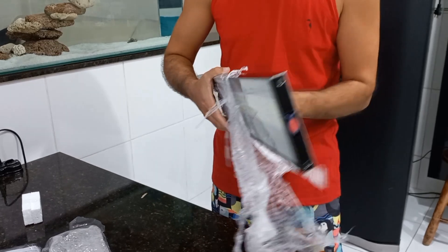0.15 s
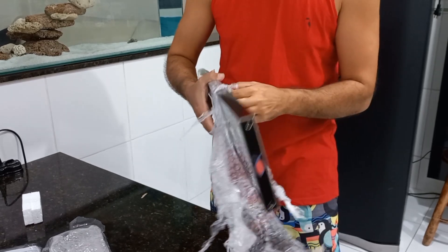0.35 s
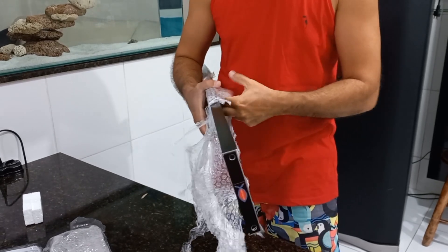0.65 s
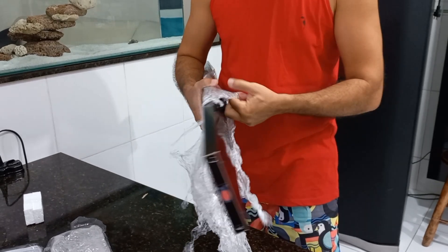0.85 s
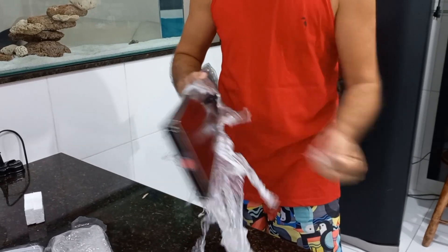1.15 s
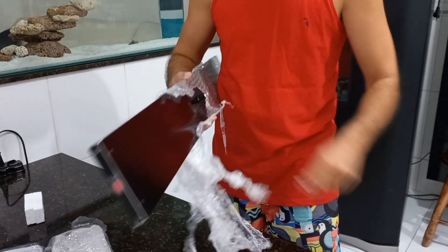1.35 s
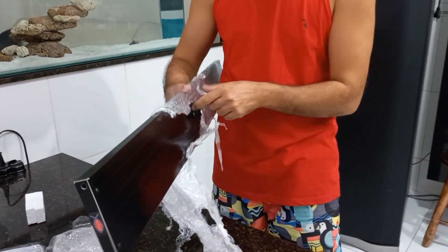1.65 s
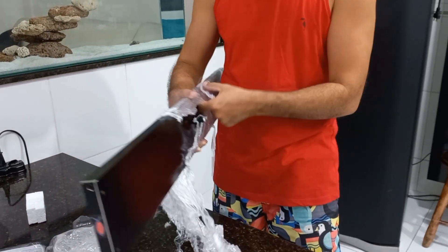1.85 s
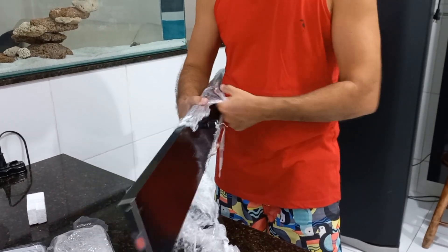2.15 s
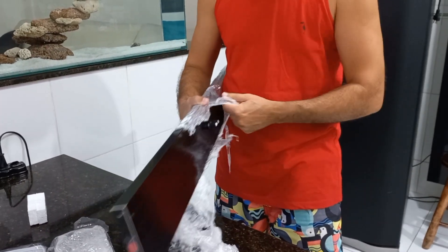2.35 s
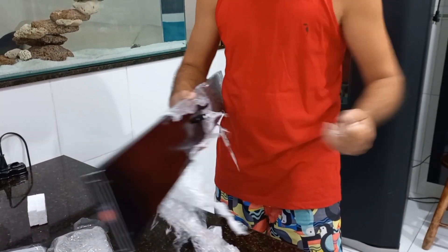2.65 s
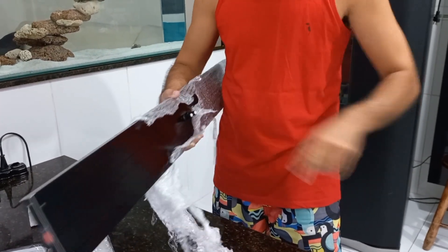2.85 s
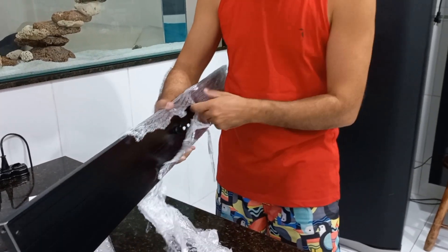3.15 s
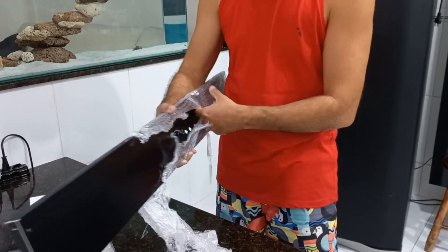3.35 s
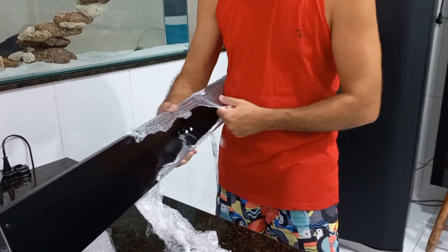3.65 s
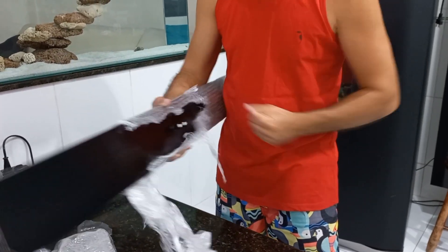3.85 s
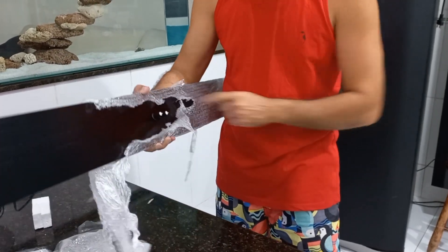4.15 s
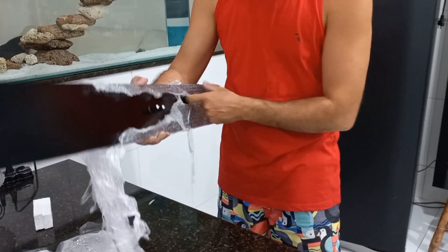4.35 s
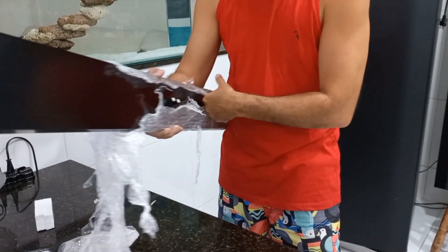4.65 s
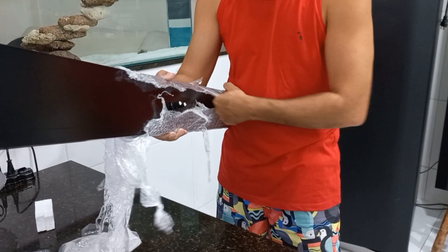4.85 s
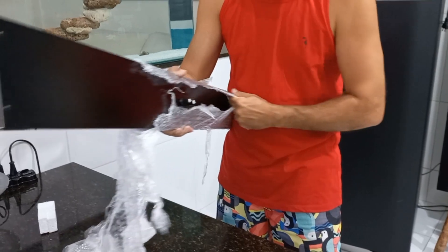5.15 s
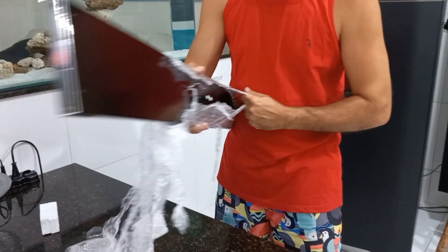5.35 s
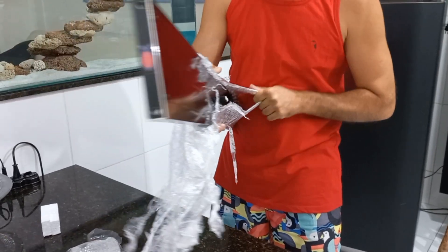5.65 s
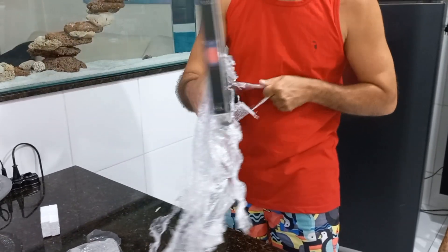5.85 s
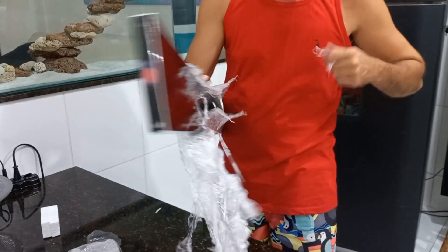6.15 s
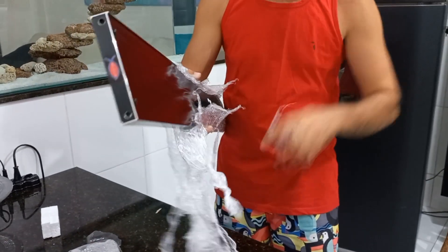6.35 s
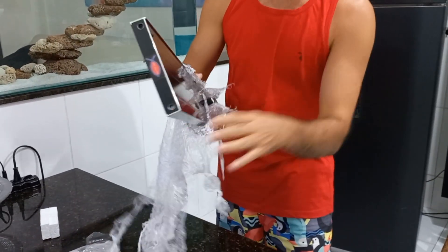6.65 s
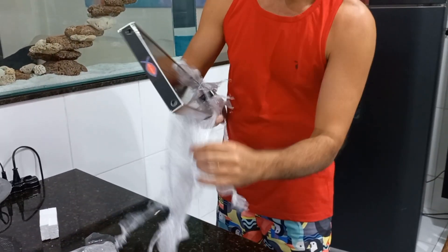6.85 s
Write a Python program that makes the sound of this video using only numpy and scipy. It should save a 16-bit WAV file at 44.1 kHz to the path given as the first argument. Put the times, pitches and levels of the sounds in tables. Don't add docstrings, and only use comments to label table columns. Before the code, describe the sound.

A steady, slightly throbbing low pump hum with buzzing harmonics and soft room murmur runs throughout, a little to the left. Film starts with faint rustles and small bumps; from 0.4 s it crinkles harder, and between 0.75 and 1.2 s comes the densest, loudest burst, with sharp cracks and a strip squeaking upward as it peels. It subsides by 1.4 s, nearly still until 1.7. Crisp snaps and dull panel thumps hit at 2.2 and 2.5-2.6 s, then lighter ticks and rubbing, with bumps at 3.1 and 3.8. A lull around 4-4.4 s leads to tugs at 4.8-4.95, a hard snap and short metallic rattle at 5.2, a bright rip near 5.7 and sharp cracks at 5.8. Smaller rustles at 6.05-6.3 fade to quiet, with a brief last crinkle near 6.9. Close microphone, hard tiled room, short bright reflections.

```python
import sys
import numpy as np
from scipy import signal
from scipy.io import wavfile
from scipy.ndimage import uniform_filter1d

SR = 44100
rng = np.random.default_rng(int(sys.argv[2]) if len(sys.argv) > 2 else 0)


def boost_factor(decibels):
    exponent = np.asarray(decibels, float) / 20
    return 10 ** exponent


def bounce(signal):
    frames = np.transpose(np.atleast_2d(signal))
    limited = np.clip(frames, -1, 1)
    pcm = np.round(limited * 32767).astype(np.int16)
    wavfile.write(sys.argv[1], SR, pcm)


N = 309042


def evened(x):
    return x / np.sqrt(np.mean(x ** 2) + 1e-20)


def unit(x):
    return x / np.linalg.norm(x, axis=-1, keepdims=True)


def peaked(x):
    return x / np.sqrt(uniform_filter1d(x ** 2, size=176).max() + 1e-20)


def read(points, hz):
    f, value = np.transpose(points)
    return np.interp(np.log(hz + 1), np.log(f + 1), value)


def curve(table):
    s, *columns = np.transpose(table)
    return [np.interp(np.arange(N) / SR, s, c) for c in columns]


def add(mix, s, sound):
    part = mix[round(s * SR):][:len(sound)]
    part += sound[:len(part)]


def band(x, lo_hz, hi_hz):
    return signal.sosfilt(signal.butter(3, [lo_hz, hi_hz], "bandpass", fs=SR, output="sos"), x)


def ring(x, hz, width):
    return signal.lfilter(*signal.iirpeak(hz, hz / width, SR), x)


# t/s, level/dB
PUMP_LOAD = [(0.0, -49), (0.97, -45), (1.65, -48), (2.2, -46), (3.14, -48.5), (3.55, -45.5), (4.17, -48.5),
             (4.56, -46), (5.98, -46), (6.28, -49), (7.0, -45.5)]
# multiple of the hum pitch, level/dB
HARMONICS = [(1.5, -13.5), (2, -14.5), (2.92, -18), (4, -14), (5, -26.5), (5.6, -18)]
# f/Hz, modulation depth
THROB = [(7, 0.11), (13.4, 0.11)]


def pump():
    t, hum_hz = np.arange(N) / SR, 120
    turns = 2 * np.pi * hum_hz * t
    throb = 1 + sum(depth * np.sin(2 * np.pi * hz * t + rng.uniform(0, 4.5)) for hz, depth in THROB)
    tone = throb * np.sin(turns)
    tone = tone + sum(boost_factor(db) * np.sin(k * turns + rng.uniform(0, 6.02)) for k, db in HARMONICS)
    return np.sqrt(2) * boost_factor(curve(PUMP_LOAD)[0]) * tone


# f/Hz, level per Hz/dB
AIR_SPECTRUM = [(15, -76), (25, -43.5), (124, -5), (214, -16.5), (330, -6.5), (399, -26.5), (483, -10.5),
                (1150, -34), (1880, -34), (2820, -48), (12600, -45.5), (15200, -51), (16500, -55)]
# f/Hz, coherence (0 to 1)
COHERENCE = [(60, .95), (250, .9), (700, .5), (1500, .1), (15000, .0)]


def air():
    frames, hz, level_db = N // 512 + 5, np.fft.rfftfreq(2048, 1 / SR), -53.5
    a, b, c, d = rng.standard_normal((frames, 1025, 4)).T
    same = np.clip(read(COHERENCE, hz), -1, 1)[:, None]
    left = a + 1j * b
    right = same * left + np.sqrt(1 - same ** 2) * (c + 1j * d)
    z = np.array([left, right]) * boost_factor(read(AIR_SPECTRUM, hz))[:, None]
    return boost_factor(level_db) * evened(signal.istft(z, nperseg=2048, noverlap=1536)[1][:, :N])


def strokes(s, db, fade_s, rise_share):
    t = np.arange(0, N + 64, 64) / SR
    late = (t - s[:, None]) / np.maximum(fade_s, 1 / 50)[:, None]
    fall = np.where(late > 0, late, -late / rise_share[:, None])
    power = boost_factor(2 * db[:, None] - 40 * fall).sum(axis=0)
    return np.interp(np.arange(N) / SR, t, power)


def tinted(x, points, unit_hz):
    hz, t, z = signal.stft(x, SR, nperseg=256)
    axis, db = np.transpose(points)
    place = (hz[:, None] + 1) / np.interp(t * SR, np.arange(N), unit_hz * np.ones(N))
    chance = rng.standard_normal((len(t), len(hz))).T
    patches = evened(uniform_filter1d(uniform_filter1d(chance, size=5, axis=0), size=8, axis=1))
    shape = boost_factor(np.interp(np.log(place), np.log(axis), db) + 1.5 * patches)
    return evened(signal.istft(z * shape, SR, nperseg=256)[1][:, :N])


# t/s, level/dB
HANDLING = [(0, -49.5), (.17, -71), (.42, -46), (.7, -43.5), (1.15, -36), (1.35, -49), (1.65, -75),
            (1.9, -46.5), (2.6, -42.5), (3.08, -65), (3.45, -41), (4.05, -56), (4.3, -54.5), (4.7, -43),
            (5.4, -44), (6.1, -52), (6.5, -90), (7.0, -48)]
# peak t/s, level/dB, 20 dB fading time/s, coarseness/dB
TUGS = [(0.03, -61, -1, -3), (.33, -47, .08, -3.5), (.4, -50, -0.1, -9.5), (.51, -34.5, -0.0748, 4),
        (.75, -31, -0.05, -1), (.81, -33, 0.0758, 9), (.93, -26, 0.09, 0.5), (1.055, -18, 0.08, -10.5),
        (1.2, -29.5, 0.13, -3), (1.76, -49, 0.07, -7), (1.86, -35.5, -0.04, 3), (1.97, -49, -0.25, -18),
        (2.08, -44, -0.04, -3), (2.22, -29, 0.0458, 5), (2.489, -34, -0.01, 8), (2.536, -21, 0.02, -22),
        (2.555, -26, 0.02, 6), (2.46, -39, -0.27, -12), (2.8, -46.5, 0.16, 6), (3.2, -52, 0.5, 0),
        (3.35, -36.5, 0.09, -6), (3.62, -39, 0.17, 3), (3.83, -33, 0.02, -3), (4.45, -41.5, 0.16, -6),
        (4.6, -50, -1.9, -10), (4.81, -46.5, -0.8, -8), (4.9, -36.5, 0.23, -3), (5.15, -35.5, 0.02, -9),
        (5.25, -28.5, 0.09, -15), (5.73, -53, 0.3, -6.5), (5.86, -31.5, 0.28, -11),
        (6.05, -50.5, 0.28, 9.5), (6.264, -30, 0.08, -24), (6.93, -35.5, 0.16, -2)]
# peak t/s, level/dB, 20 dB fading time/s, coarseness/dB
JERKS = [(0.465, -30.5, 0.18, -7), (1.15, -27, -0.02, -20), (1.779, -39, 0.18, -7), (3.176, -46, -0.1, -8),
         (6.222, -34.5, 0.1, -20), (3.796, -31, 0.04, -4.5), (5.667, -24.5, 0.03, -7.5),
         (5.682, -20.5, 0.0576, -6.5), (5.69, -22.5, 0.08, -7), (6.59, -56.5, 0.3, -7),
         (6.755, -54, 0.2, -13)]
# peak t/s, level/dB, 20 dB fading time/s
SLIDES = [(.2, -41.5, 0.3), (.47, -45, 0.1), (.75, -37.5, 0.3), (1.01, -31.5, -0.06), (1.14, -49.5, 1),
          (1.7, -43, 0.16), (2.21, -38, -0.13), (2.6, -32.5, 0.26), (2.52, -36.5, 0.13), (2.8, -46, -0.2),
          (3.2, -44, 0.3), (3.6, -44.5, 0.3), (3.868, -30.5, 0.16), (4.35, -42, 0.6), (4.9, -44, -0.5),
          (5.23, -34.5, 0.04), (5.685, -46, 1.1), (5.86, -37.5, 0.16), (6.05, -32, 0.22), (6.95, -44, 0.7)]
# f/Hz, level per Hz/dB
FINE_CREASES = [(1470, -15), (2500, -3.5), (3460, 6), (8910, 13.5), (13100, 16.5), (16000, 12),
                (16500, 3.5)]
# f/Hz, level per Hz/dB
SCRAPE = [(600, -15), (1100, -4), (1800, 0), (2600, -1), (4000, -3.5), (6000, -13.5), (9000, -40)]
# t/s, level/dB, f/Hz
STRIP = [
    (.89, -86.5, 1900),
    (.903, -37, 2040),
    (.95, -39.5, 2170),
    (.995, -65, 2300),
    (1.035, -29, 2660),
    (1.14, -57, 2560),
    (1.21, -35, 2550),
    (1.3, -60, 2600),
    (1.45, -99.5, 2700),
]
# multiple of its pitch, level/dB
STRIP_BAND = [(.5, -40), (.75, -14), (.9, -3), (1, 0), (1.15, -4), (1.4, -12), (2, -40)]


def rustle():
    (busy_db,), (s, db, fade_s, coarse_db) = curve(HANDLING), np.transpose(TUGS + JERKS)
    busy = boost_factor(busy_db) ** 2
    rise = np.repeat([0.63, 0.056], [len(TUGS), len(JERKS)])
    hiss = np.sqrt(strokes(s, db, fade_s, rise) + busy)
    scrape = np.sqrt(strokes(s, db + coarse_db, 1.09 * fade_s, rise) + busy * boost_factor(-3) ** 2)
    slide = np.sqrt(strokes(*np.transpose(SLIDES), np.full(len(SLIDES), .5)) + busy * boost_factor(-6) ** 2)
    strip_db, strip_hz = curve(STRIP)
    clumps = np.clip(evened(uniform_filter1d(rng.standard_normal(N), size=250)), -2, 2)
    size = boost_factor(1.7 * np.minimum(rng.exponential(1, (3, N)), 3) + 2.0 * clumps)
    struck = rng.random((3, N)) < 2000 / SR
    creases = evened(size * struck * rng.choice([-1., 1.], (3, N)))
    creases = creases + 0.38 * rng.standard_normal((3, N))
    ports = creases[0] + 2.0 * creases[1:]
    rub = evened(band(ring(rng.standard_normal(N), 390, 355), 200, 1220))
    film = boost_factor(-5) * hiss * tinted(ports, FINE_CREASES, 0.96)
    film = film + boost_factor(-8.5) * scrape * tinted(ports, SCRAPE, 1.0)
    return film + boost_factor(strip_db) * tinted(ports, STRIP_BAND, strip_hz) + boost_factor(-9.5) * slide * rub


# f/Hz, 60 dB decay time/s
DECAY_TIMES = [(150, 0.37), (500, 0.76), (1700, 0.65), (4600, 0.63), (12000, 0.43)]


def walls(x):
    out, phase = np.zeros((2, N)), np.arange(N) / SR * 7.3
    slots = np.arange(120, SR - 12, 12)
    for k in range(3):
        taps = np.zeros((2, SR))
        at = slots + rng.integers(0, 12, (2, len(slots)))
        np.put_along_axis(taps, at, rng.choice([-1., 1.], at.shape), 1)
        hz, t, z = signal.stft(taps, SR, nperseg=256)
        low = np.exp(-(hz[:, None] / 450) ** 2)
        z[1] = low * z[0] + np.sqrt(1 - low ** 2) * z[1]
        tail = signal.istft(z * boost_factor(-60 * t / read(DECAY_TIMES, hz)[:, None]), SR, nperseg=256)[1]
        share = np.sqrt(2 / 3) * np.cos(phase + k * np.pi / 3)
        out += signal.fftconvolve((share * x)[None], tail / np.linalg.norm(tail[0]), axes=1)[:, :N]
    return out


# t/s, level/dB, fold f/Hz, dull part level/dB, bright part level/dB
CRACKS = [(0.476, -38, 7500, -22.5, -2), (0.7689, -20, 4560, -12, -1), (0.7802, -21.5, 4430, -4, 2),
          (0.7958, -20.5, 2290, -26, -3), (0.8963, -15.5, 2000, -7.5, -5), (1.0034, -19, 2400, -4, 3.5),
          (1.029, -15, 2780, -11, -7), (1.8214, -32, 2450, -22, -11), (1.8418, -38, 2610, -8, 11),
          (2.168, -13, 6600, -7.5, -13), (2.1912, -29, 2580, 0, 8), (2.195, -23.5, 7540, -1, 0),
          (2.4761, -18, 3500, -3, -3.5), (2.4795, -30, 2950, -5, -20), (2.56, -28, 2320, -16, -16),
          (3.1158, -48.5, 1300, 11.5, 11), (3.5637, -31.5, 2120, 6.5, -7.5), (4.825, -27, 2760, -1.5, -5),
          (4.8581, -30, 2470, 1.5, -19), (4.952, -23, 1900, 3, 1.5), (5.1708, -23.5, 2430, 3.5, 6),
          (5.2174, -17, 2740, -3, 0.5), (5.8205, -19, 4400, -0.5, -8), (5.83, -15.5, 7650, -10.5, 1.5),
          (5.93, -30.5, 2700, 0.5, -6)]
# t/s, level/dB, fold f/Hz, thinness/dB (treble up,
# body down)
TICKS = [(0.508, -32.5, 6500, 1), (0.7173, -45, 3200, 6), (0.7274, -37, 3220, 1), (1.6656, -57, 5960, 10.5),
         (1.7792, -61, 5400, 6), (1.853, -34.5, 7500, 6.5), (2.0014, -48, 3250, 4), (2.067, -42, 3100, -1),
         (2.105, -40, 2750, -12), (2.533, -46, 10400, 25), (2.7264, -43, 4770, -8), (3.1774, -40, 2850, -2),
         (3.248, -46.5, 7800, 14.5), (3.3435, -37, 4900, -4.5), (3.3621, -39, 3000, 7),
         (3.3903, -43, 3220, 7.5), (3.6423, -37.5, 6040, 10), (3.792, -37, 1830, -8.5),
         (3.8214, -39, 2400, 8), (3.8423, -38.5, 2100, -17), (4.211, -48, 1950, -10.5),
         (4.541, -42.5, 4200, 2.5), (4.5703, -34.5, 7600, 2.5), (4.6032, -37, 2800, -1),
         (4.9356, -42, 7500, 10), (5.163, -46, 7000, 10), (5.452, -39, 2800, 0.5),
         (5.5954, -41, 4940, 11.5), (5.6282, -42.5, 4570, 10), (6.1687, -52.5, 7200, 15.5),
         (0.231, -53, 1800, -0.5), (4.843, -40, 2680, -2), (2.429, -47, 3100, 7),
               (3.1896, -41.5, 3960, 4), (4.292, -62.5, 1800, -8), (4.359, -49.5, 2200, -5),
               (4.409, -52.5, 4100, 12), (5.0627, -43, 1800, 6), (5.414, -53, 7500, 4),
               (5.577, -44.5, 7600, 7.5), (6.614, -61.5, 3650, 1), (6.665, -66.5, 5700, 3),
               (0.033, -51, 2500, -5), (0.156, -60, 5000, 3.5), (1.9671, -56, 11400, 8),
               (2.543, -37, 4000, 7), (2.577, -40, 3000, 0), (3.204, -46, 3300, 2), (5.61, -45.5, 8000, 7),
               (6.033, -36, 2500, -2), (6.1, -52, 3000, -10), (6.2036, -53, 4100, 5)]


def snaps():
    direct, feed, t = np.zeros((2, N)), np.zeros(N), np.arange(300) / SR
    click = np.eye(1, 400)[0]
    wide, dull, bright = [unit(band(click, *edges)) for edges in ((2540, 6600), (678, 2630), (6880, 15800))]
    spans = np.array([.0017, .00005, .0020, .0011])
    # share thrown to the walls, dB
    rows = [row + (-4,) for row in CRACKS]
    rows += [(s, db, hz, -7.5 - thin, -1 + thin, -3) for s, db, hz, thin in TICKS]
    chance = rng.standard_normal((len(rows), 3, 300))
    for (s, db, hz, dull_db, bright_db, wall_db), z in zip(rows, chance):
        fold = unit(ring(click, hz, 0.2 * hz))
        colours = np.array([wide, fold, -dull, -bright])
        sizes = boost_factor(db + 20 + np.array([-5, -2, dull_db, bright_db]))
        for port in range(2):
            smears = (z[0] + 1.59 * z[1 + port]) * np.exp(-(t / spans[:, None]) ** 2)
            add(direct[port], s, sizes @ unit(signal.fftconvolve(colours, smears, axes=1)))
        add(feed, s, boost_factor(wall_db) * sizes @ colours)
    worktop_s, worktop_db = 0.0033, -13.5
    echo = np.roll(direct[::-1], round(worktop_s * SR), axis=1)
    return direct + boost_factor(worktop_db) * echo, feed


# t/s, peak level/dB, f/Hz, scrabble length/s
BUMPS = [(0.158, -38.5, 606, 0.085), (0.391, -35.5, 336, 0.036), (0.531, -32.5, 347, 0.051),
         (0.735, -35, 660, 0.036), (0.797, -23.5, 656, 0.0069), (0.897, -26.5, 620, 0.02),
         (0.998, -37, 633, 0.04), (1.325, -35, 647, 0.047), (1.672, -30, 345, 0.028),
         (2.108, -34, 394, 0.094), (2.193, -23, 490, 0.059), (2.224, -29, 670, 0.11),
         (2.476, -43.5, 506, 0.049), (2.579, -20.5, 384, 0.033), (2.595, -23, 336, 0.031),
         (3.12, -23.5, 397, 0.052), (3.559, -38, 493, 0.063), (3.822, -25.5, 660, 0.015),
         (3.844, -24.5, 317, 0.029), (4.293, -32.5, 455, 0.039), (4.856, -31, 390, 0.059),
         (4.95, -29, 660, 0.022), (5.173, -29.5, 644, 0.012), (5.215, -28.5, 660, 0.035),
         (5.818, -26.5, 610, 0.013), (6.042, -29, 326, 0.039), (6.152, -33.5, 350, 0.02),
         (6.293, -42, 490, 0.03), (3.184, -36, 400, 0.0097), (3.221, -37, 416, 0.026),
         (3.872, -29.5, 400, 0.027), (3.41, -37.5, 380, 0.037), (6.72, -46, 340, 0.053)]


def bumps():
    out, t = np.zeros(N), np.arange(6000) / SR
    chance = rng.standard_normal((len(BUMPS), 6000))
    for (s, db, hz, length), z in zip(BUMPS, chance):
        push = z * np.exp(-t / max(length, .003)) + 2.03 * np.exp(-t / 0.00032)
        patch = peaked(ring(push, hz, 98))
        body = peaked(band(push, 240, 840))
        spray = peaked(ring(push * np.exp(-t / 0.042), 1100, 840))
        add(out, s, boost_factor(db - 5.0) * peaked(patch + 0.41 * body + 0.14 * spray))
    return band(out, 120, 1680)


# t/s, level/dB
PUFFS = [
    (.78, -57),
    (.9, -59),
    (1.0, -58),
    (2.6, -57),
    (5.23, -50),
    (5.84, -47),
]


def puffs():
    out, t = np.zeros(N), np.arange(3000) / SR
    swell = np.exp(-((t - .025) / .013) ** 2)
    for s, db in PUFFS:
        add(out, s - .02, boost_factor(db + 8) * np.sin(2 * np.pi * 64 * t) * swell)
    return out


# f/Hz, bandwidth/Hz, level/dB
PANEL_MODES = [(425, 110, -7), (1090, 190, -1), (1790, 150, 0), (2700, 240, -4)]
# t/s, level/dB, pitch factor set by the grip
KNOCKS = [
    (5.219, -29.5, 1.),
    (5.688, -46, .84),
]


def panel():
    out, t = np.zeros(N), np.arange(16000) / SR
    for s, db, grip in KNOCKS:
        rattle = rng.standard_normal(len(t)) * np.exp(-t / 0.068)
        modes = [boost_factor(d) * peaked(ring(ring(rattle, f * grip, w), f * grip, w)) for f, w, d in PANEL_MODES]
        add(out, s, boost_factor(db) * peaked(sum(modes)))
    return out


def scene():
    walls_db, left_db = 2.5, 1.0
    direct, feed = snaps()
    hands = bumps() + panel() + rustle()
    near = direct + hands
    near[1] = np.roll(near[1], 1)
    near[0] += puffs()
    hum = pump() * boost_factor(np.array([[.5], [-1.5]]))
    mix = near + boost_factor(walls_db) * walls(feed + .5 * hands[0]) + hum + air()
    return mix * boost_factor(np.array([[left_db], [-left_db]]))


def top_cut(x):
    return signal.sosfilt(signal.butter(12, 16990, fs=SR, output="sos"), x)


def record(dry):
    thinned = signal.lfilter(*signal.butter(2, 55, "highpass", fs=SR), dry)
    limited = np.tanh(thinned / 1.3) * 1.3
    edge = signal.firwin(255, 15900, window=("kaiser", 5), fs=SR)
    mix = signal.oaconvolve(limited, edge[None], "same")
    return top_cut(mix)


dry = scene()
out = record(dry)
bounce(out)
```